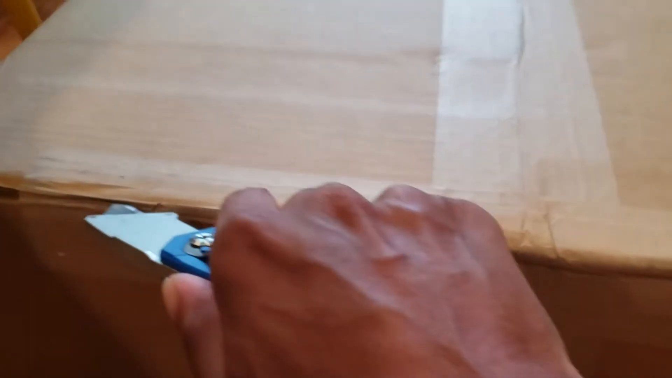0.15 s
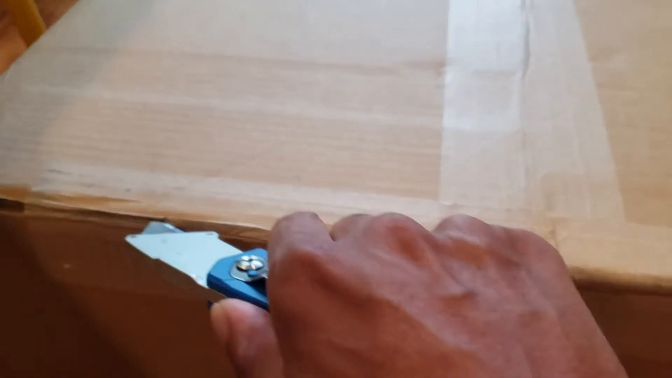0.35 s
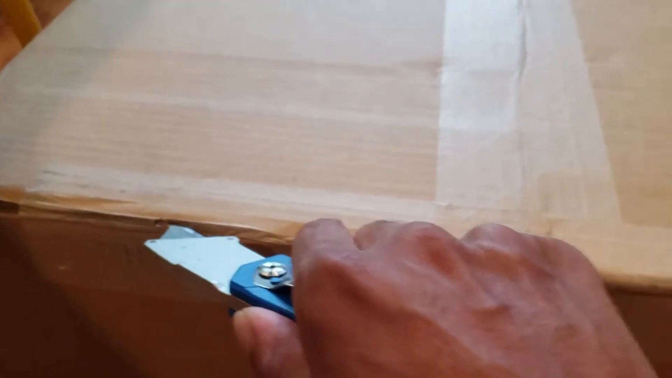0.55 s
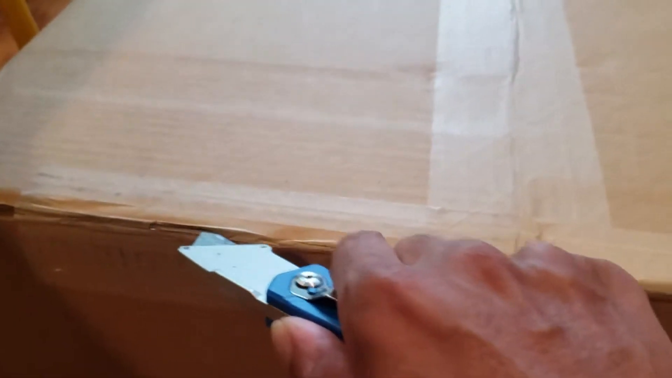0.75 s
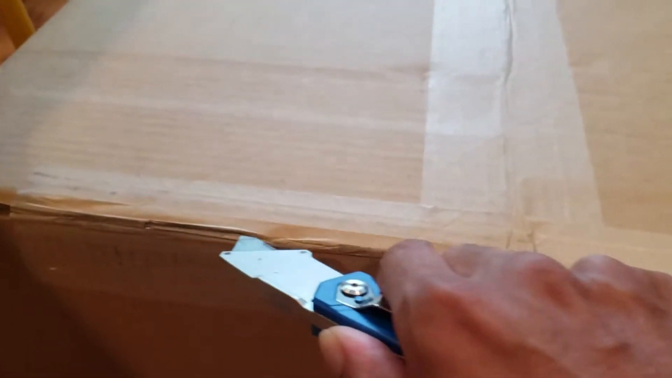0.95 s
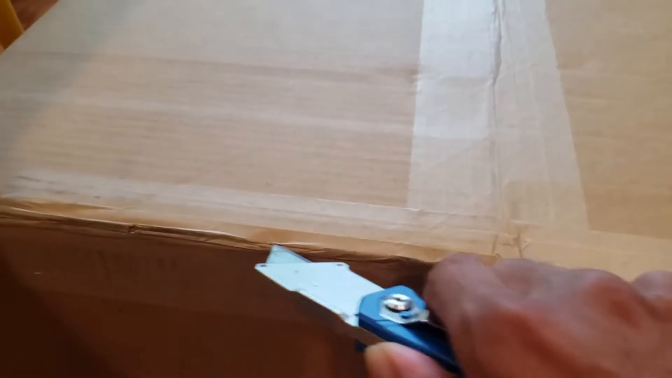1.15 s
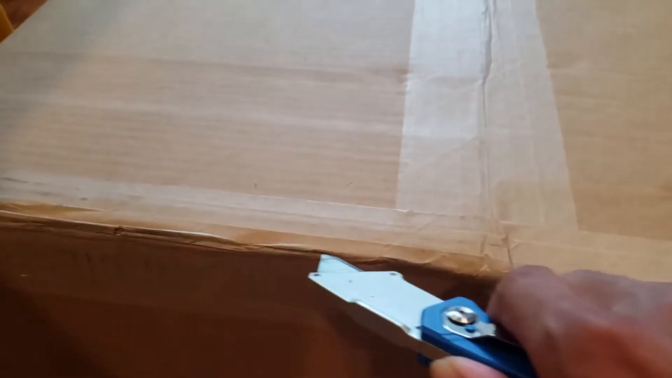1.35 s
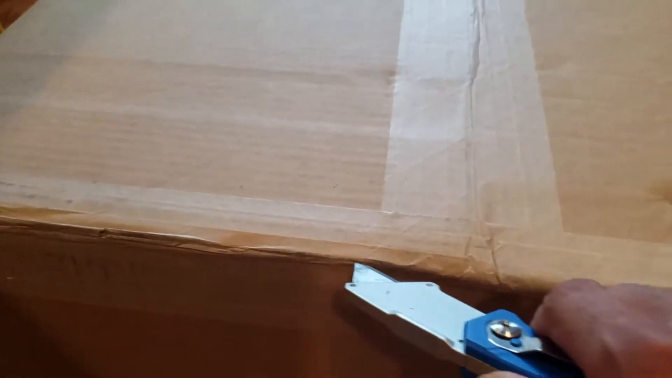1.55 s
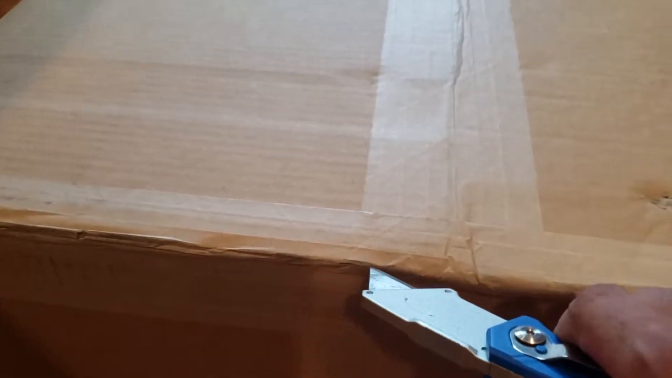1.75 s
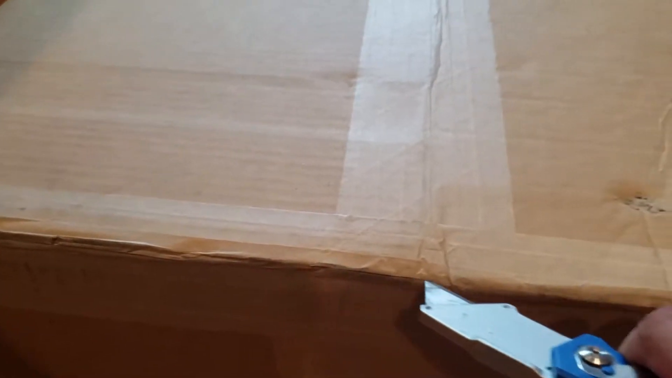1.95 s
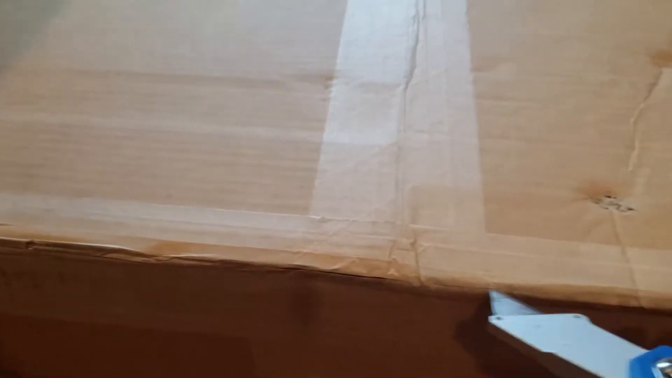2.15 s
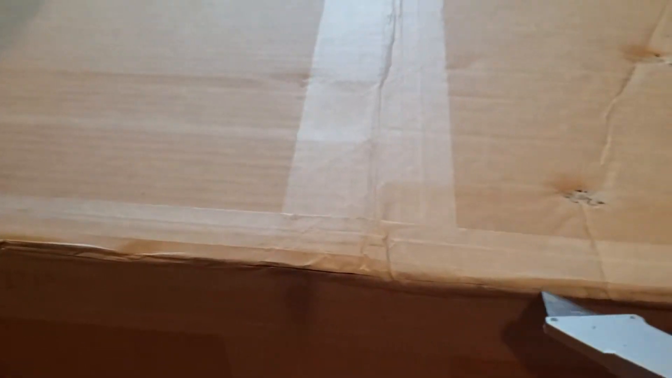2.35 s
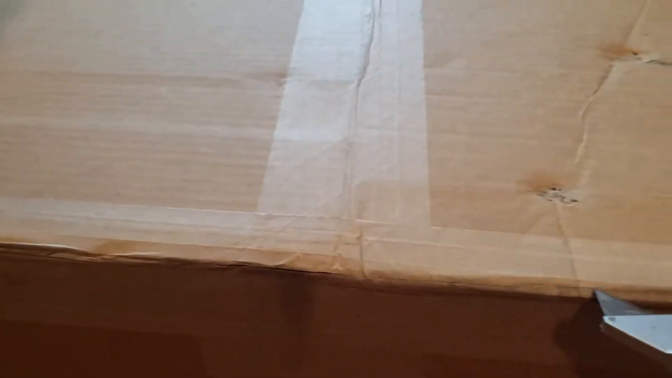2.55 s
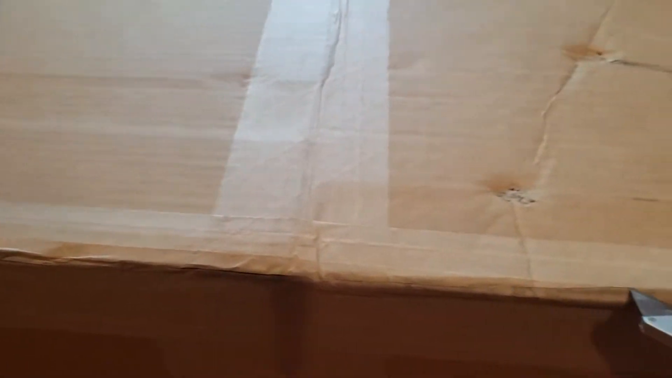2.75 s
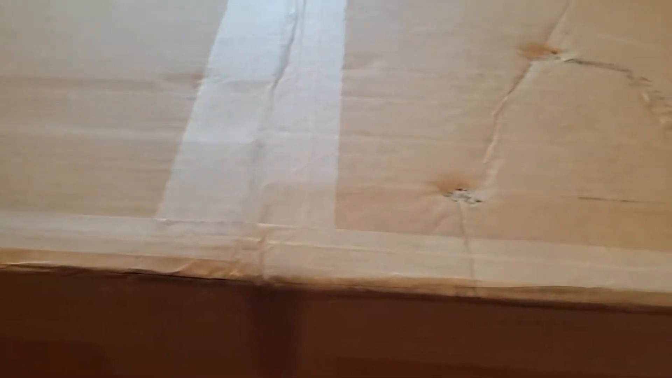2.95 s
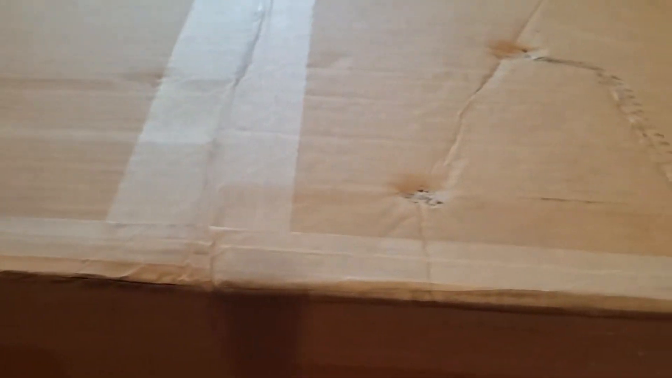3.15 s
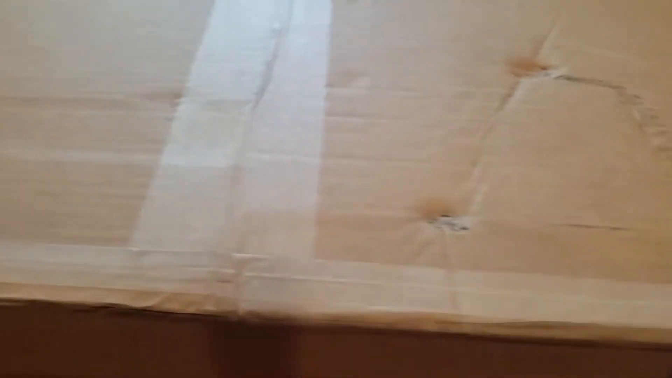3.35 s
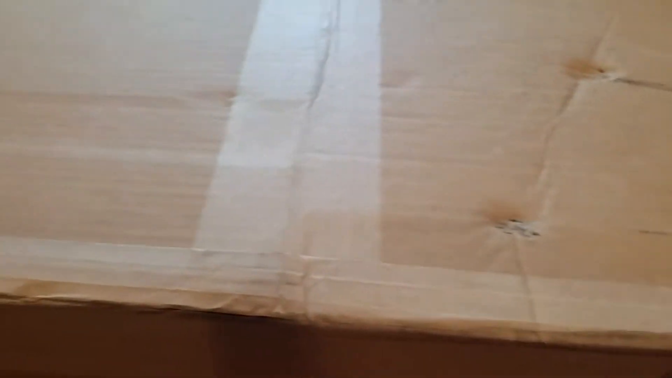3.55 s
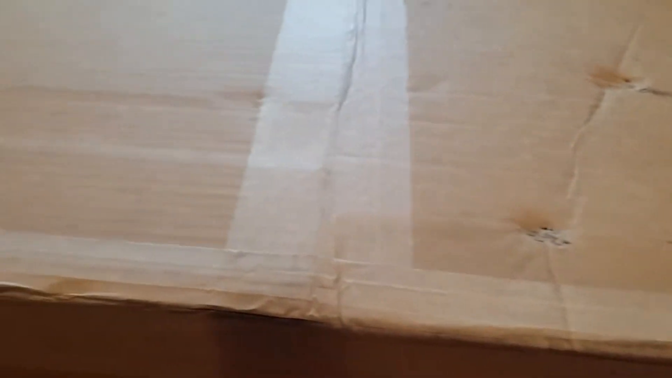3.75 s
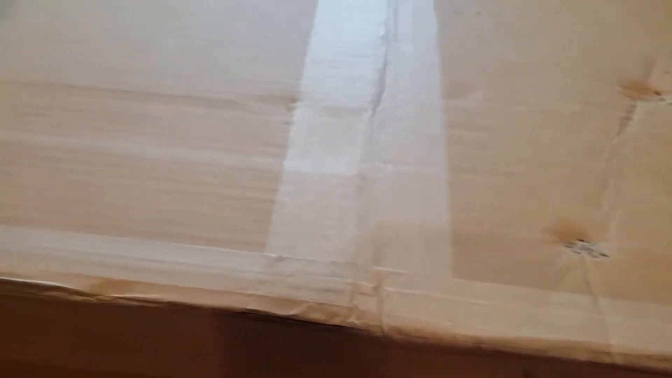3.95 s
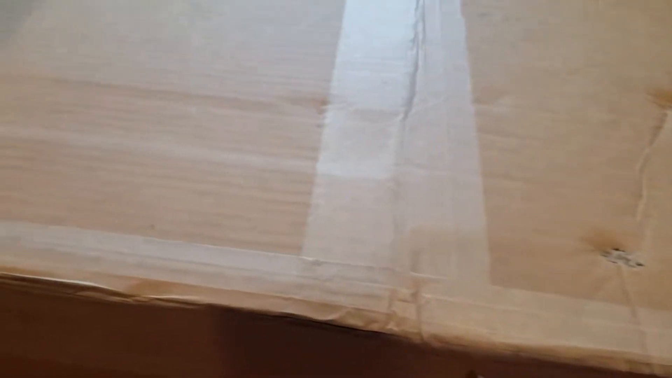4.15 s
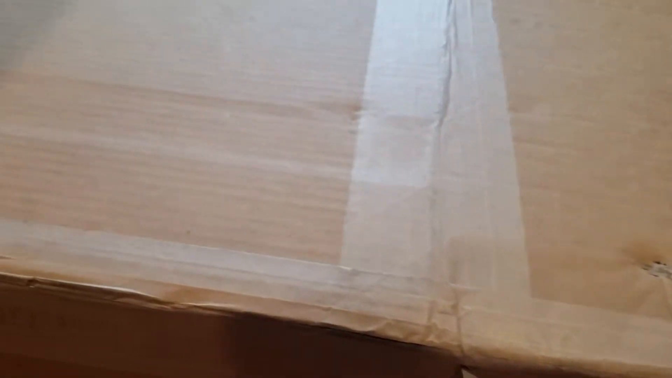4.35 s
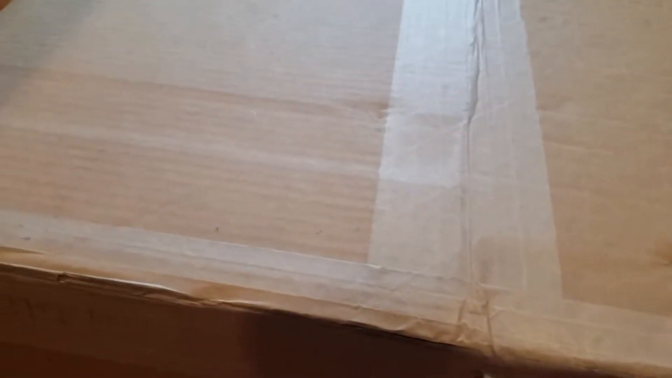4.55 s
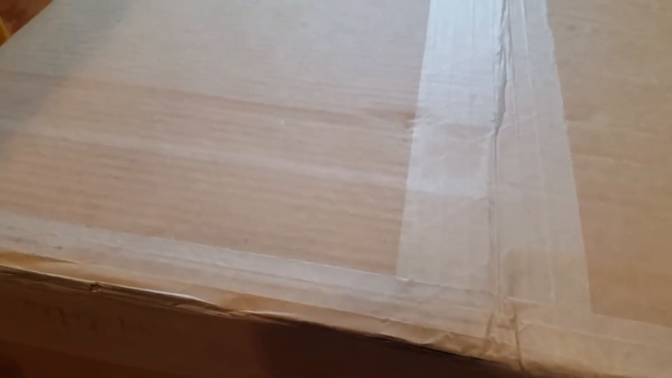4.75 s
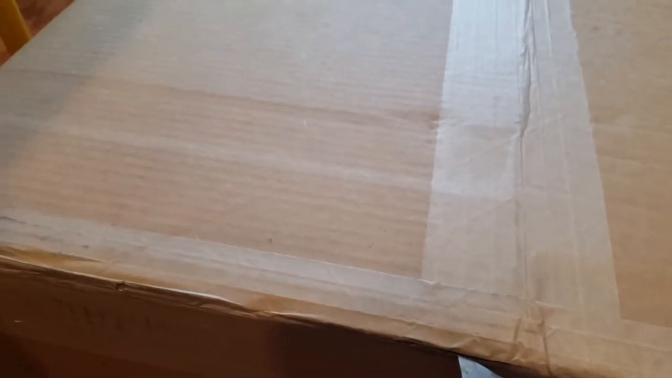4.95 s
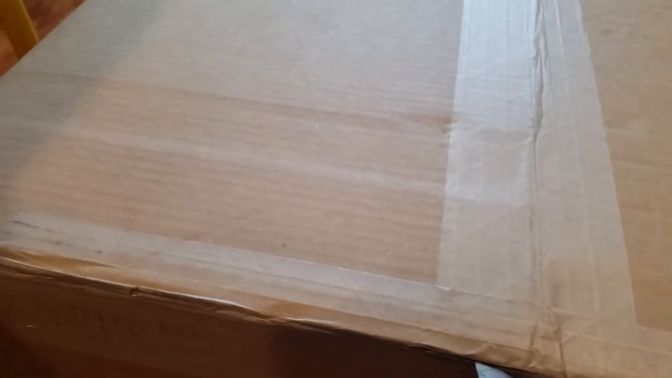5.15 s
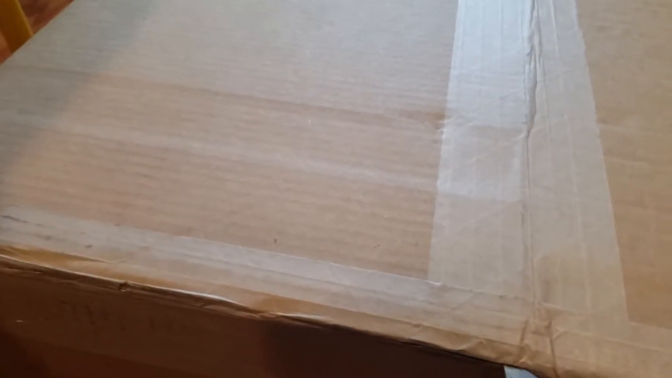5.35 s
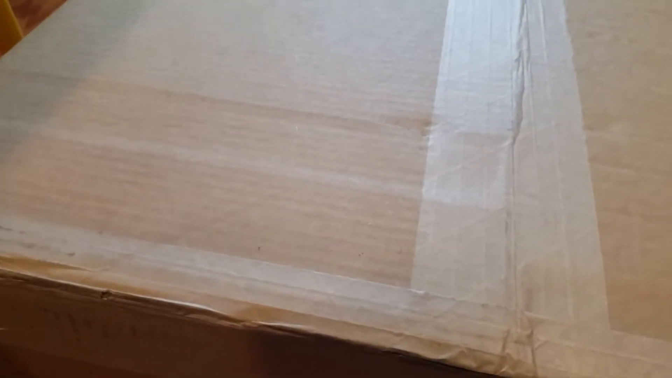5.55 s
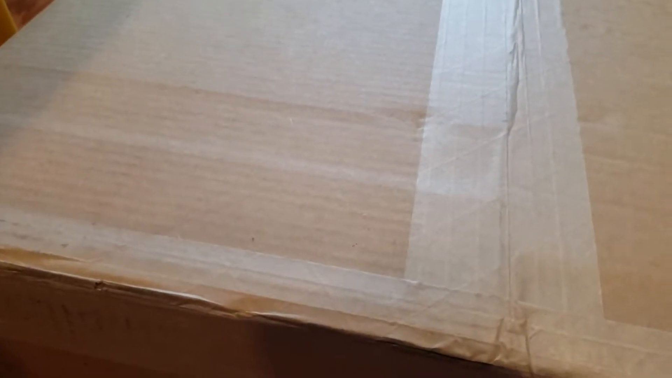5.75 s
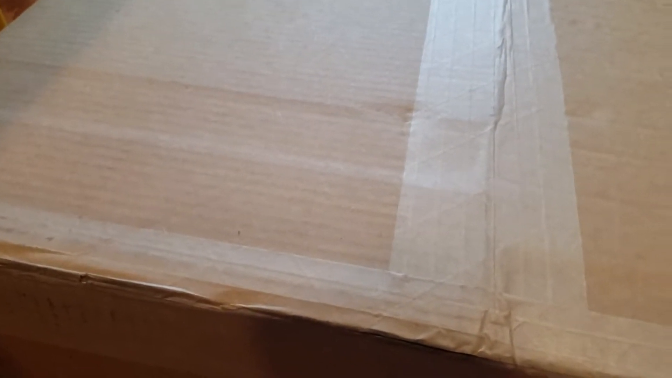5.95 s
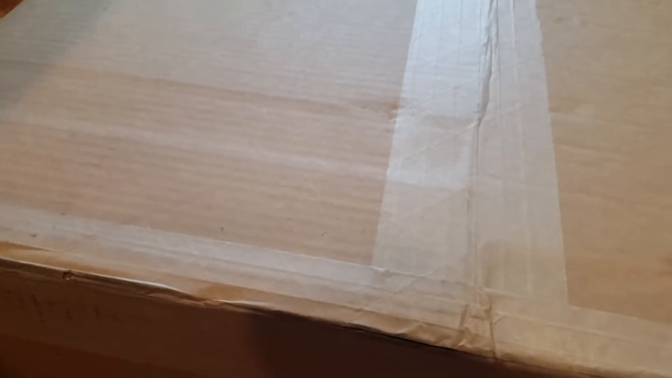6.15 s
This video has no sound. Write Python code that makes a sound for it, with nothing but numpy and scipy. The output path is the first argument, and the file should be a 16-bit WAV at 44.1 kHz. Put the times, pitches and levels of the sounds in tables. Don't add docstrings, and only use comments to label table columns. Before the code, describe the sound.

A utility knife rasps through packing tape on a cardboard box, snapping and crackling, then pauses for faint clicks before a second scratchy cut.

```python
import sys
import numpy as np
from scipy import signal
from scipy.fft import rfft, irfft, next_fast_len
from scipy.io import wavfile
from scipy.ndimage import uniform_filter1d, map_coordinates

SR = 44100
rng = np.random.default_rng(int(sys.argv[2]) if len(sys.argv) > 2 else 0)


def volts_from_decibels(level):
    exponent = np.asarray(level, float) / 20
    return 10 ** exponent


def generate_wav(sig):
    pcm = np.round(np.clip(np.atleast_2d(sig).T, -1, 1) * 32767).astype(np.int16)
    wavfile.write(sys.argv[1], SR, pcm)


N = 277429
SIZE = next_fast_len(N + SR)
HZ = np.maximum(np.arange(SIZE // 2 + 1) * SR / SIZE, 1)
CUTOFF_HZ = 15760
HUSH_DB = -78
ROOM_T60_S, ROOM_DB = 0.24, -13
MEAN_FORCE_DB = -46
SINK_S, RECOVER_S, PULL_EDGE_S = 0.022, 0.018, 0.007
SNAP_S, SNAP_FLAP_DB = 0.0017, -1.5
RIP_FLAP_DB = 1.5

# (time [s], level [dB])
HUM_LEVEL = [(0.0, -57), (0.7, -61), (0.75, -59.5), (3.06, -57.5), (4.1, -65.5), (4.4, -58), (4.62, -63),
             (6.29, -60.5)]
# (frequency [Hz], density [dB per Hz])
HUSH_SPECTRUM = [(25, -28), (47, -23), (80, -7), (133, -19), (149, -16), (217, -15), (271, -31), (323, -23),
                 (353, -32), (702, -38), (2970, -44), (8600, -54), (12000, -44), (16000, -43)]
# (frequency [Hz], likeness [0-1])
HUSH_LIKENESS = [(60, 1), (180, 0.68), (550, 1), (1650, .05), (15000, 0)]
# (delay [s], level [dB])
NEAR_ECHOES = [
    (.0006, -11),
    (.0013, -11),
    (.0024, -12),
]
# (frequency [Hz], level difference [dB])
PORT_LEAN = [(60, -4.5), (92, 2.5), (140, 0.5), (210, 2), (330, 0.5), (500, -1.5), (770, -2.5),
             (1170, -0.5), (1790, -7), (2740, -11.5), (4190, -1), (6410, 7), (9810, 0), (15000, 0)]
# (frequency [Hz], phase lead [rad])
PORT_LEAD = [(0.01, 0.), (500, .3), (1300, 1.5), (2500, 1.7), (4500, 1.46), (7000, 1.5), (10000, 1.4),
             (16000, 0)]
# (frequency [Hz], likeness [0-1])
KNIFE_LIKENESS = [(60, 0.7), (150, 1), (400, 0.7), (1200, 0.96), (3000, 0.2), (6000, 1), (13000, 1)]
PLACES_S = [.6, 1.5, 2.6, 4.7, 5.9]
# (frequency [Hz], width [Hz], lift at each of five places [dB])
MODES = [(160, 41, 6, 6, 5., 9, 9.5), (225, 14, 5, 17.5, 2, 16.5, -2), (314, 59, 5.5, 7, 11, 5, 7),
         (506, 27, 5.5, 7, 3, -11, 14.5), (654, 69, 0, 0, 6.5, 7.5, 4.5),
         (883, 48, -5.5, 2.5, -0.5, -9, 10), (1004, 220, 13, 8, 3, 4, 10),
         (1234, 45, 0, -1, 5, -4, 4.5), (1410, 60, 2.5, 4, 4.5, 3.5, 4),
         (1644, 42, -3.5, -8.5, 9, -27, -3),
         (2125, 400, 8.5, 5, 2.5, -7, 4), (2462, 170, -1.5, 6, 7, -3.5, 11),
               (2787, 200, 9, -1.5, 6, 7, 2), (3223, 220, 2, 1.5, 7.5, -10.5, 7.5),
               (3990, 200, 7.5, 1, 3.5, 5.5, -8), (4760, 290, 0, 5, -0.5, 3.5, 3),
               (5600, 620, 1, 2.5, -2, 8.5, 4), (6460, 870, 4, 5.5, 3, 1.5, 1.5),
               (7210, 1100, 8, 4, 3.5, 10, 7), (8700, 660, -1, -2.5, -5, -4, -1),
               (11960, 580, 5, -5, 0, 4, -0.5), (11400, 900, -1.5, 0.5, 1, -8, 2),
               (14070, 1400, 4.3, 3, 0, -9, 6), (15670, 750, 4.5, 5, 3, -1, 6.5)]
# (frequency [Hz], density [dB per Hz])
TEAR_COLOUR = [(35, -37), (60, -3), (149, -4), (253, -10.5), (497, -9.5), (572, -10), (657, -12),
               (1170, -19), (2470, -8), (5200, -10), (7200, -11), (8470, -14), (12600, -2), (15500, -3.5)]
# (low edge [Hz], high edge [Hz])
ZONES_HZ = [
    (1700, 4400),
    (70, 450),
    (450, 1700),
    (4400, 17000),
]
# (share of force swing followed [dB per dB], level over mean force at five places [dB])
ZONE_FOLLOWS = [
    (0.7, -4.5, -10.5, -9.5, -11, -7.5),
    (1.2, -2.5, -5, -7.5, 0.5, -10),
    (1.1, 4, 5, 4, 4.5, 3),
]
# (time [s], length [s], frequency [Hz], width [Hz], level [dB])
RUBS = [(3.008, 0.053, 1110, 250, -54), (4.318, 0.069, 2830, 370, -51), (4.915, 0.021, 3100, 140, -47),
        (5.1, 0.01, 7400, 790, -58.5), (5.34, 0.19, 1570, 360, -53), (5.334, 0.12, 1010, 63, -54),
        (5.3, .15, 2200, 190, -45.5), (2.55, 0.35, 3050, 220, -49)]
# (start [s], end [s], force at start [dB], force at end [dB], brightness [dB])
PULLS = [(0, .397, -51, -50, 1.5), (0.399, 0.473, -53.5, -66, 2), (.47, 0.577, -71.5, -66.5, 2.5),
         (0.584, 0.763, -51.5, -48.5, -1), (0.759, 1.239, -46, -48, -1), (1.235, 1.798, -45.5, -47.5, 0),
         (1.799, 1.837, -45, -41.5, 1), (1.837, 2.562, -41.5, -43, 1.5), (2.557, 2.86, -43, -38, -2.5),
         (2.855, 2.955, -40, -39, -0.5), (2.952, 3.049, -44.5, -58.5, 0), (4.324, 4.367, -63.5, -49.5, 1),
         (4.368, 4.416, -49.5, -58, 5), (4.541, 4.64, -67, -88, 2), (4.904, 5.032, -66, -71, -1.5),
         (5.194, 5.322, -57.5, -49.5, 1.5), (5.321, 5.446, -46.5, -51.5, 3.5),
         (5.45, 5.591, -60.5, -59.5, -0.5), (5.585, 5.636, -63.5, -43, 1), (5.637, 5.672, -48.5, -52, 0),
         (5.663, 5.804, -39.5, -45, 0), (5.803, 6.296, -43, -41.5, 0)]
# (time [s], length [s], depth [dB])
STALLS = [(0.091, 0.059, 4.5), (1.101, 0.04, 9), (1.191, 0.041, 3.5), (1.636, 0.16, 5), (1.984, 0.063, 11),
          (2.034, 0.042, 6), (2.815, 0.0508, 7), (5.286, 0.036, 5.5), (5.756, 0.056, 3.5),
          (6.128, 0.069, 2.5)]
# (time [s], length [s], boom level [dB])
THUMPS = [
    (1.092, 0.092, -54.5),
    (5.635, 0.05, -37.5),
]
# (time [s], peak [dB], weight [dB], brightness [dB], rubbing [s])
TOUCHES = [(4.5288, -46, -4, 7.5, 0.012), (4.9226, -42, -25, -15, 0.0075), (4.9861, -58, -14.5, 8, 0.017),
           (5.106, -67, -10.5, 17.5, 0.039), (5.1334, -57, -8, -7, 0.0097)]
# (time [s], peak [dB], weight [dB], brightness [dB], tearing [s])
RIPS = [(0.092, -41.5, -15, 4, 0.0064), (0.139, -33.5, -10.5, 4.5, 0.0074),
        (0.5765, -22.5, -10, -0.5, 0.016), (0.615, -37.5, -1, 9, 0.012), (1.152, -27.5, -11, 8, 0.01),
        (1.192, -35, -11, 3, 0.019), (1.2373, -22.5, -17, 0.5, 0.022), (2.023, -32.5, -13, 6, 0.0095),
        (2.036, -32, -10.5, 6.5, 0.015), (2.0725, -35, -12.5, 6, 0.0065), (2.193, -37, -22, 5, 0.047),
        (2.5436, -30, -9, 0, 0.012), (2.871, -31, -3, 3, 0.014), (2.909, -37, -13, 7, 0.016),
        (3.035, -42.5, -18, -8, 0.0087), (5.442, -32.5, -7.5, 9.5, 0.018), (5.625, -41, -11.5, 3, 0.0086),
        (5.636, -25, -12, 6, 0.007), (5.662, -39, -12, 8, 0.0058), (5.883, -40.5, 1, 14.5, 0.0083),
        (5.9235, -36.5, -8.5, 12, 0.023), (6.1037, -40, -26, -1, 0.014), (6.204, -33.5, -11.5, 4.5, 0.01),
        (6.232, -32, -17, 5, 0.013)]
# (time [s], peak [dB], weight [dB], brightness [dB])
SNAPS = [(0.033, -40, -20, 7), (0.362, -41, -19.5, 2), (0.384, -41, -23, 0), (0.389, -53, -14, 3),
         (0.4112, -20, -18, -11), (0.429, -29.5, -16, -5), (0.4945, -46, -19, -14),
         (0.5418, -38.5, -36, -8.5), (0.5485, -41, -20, -3), (0.5753, -35, -23, 2),
         (0.578, -20, -25.5, -22), (4.4003, -33.5, -6.5, -5), (4.9867, -53, -9, 9.5),
         (5.1024, -72.5, -4, 23), (5.114, -74.5, -4, 6.5), (5.185, -58, -12, 3), (5.195, -48, -15, 11),
         (5.4553, -21, -11, 4)]


def at_hz(points):
    hz, value = np.transpose(points)
    return np.interp(np.log(HZ), np.log(hz), value)


def drift(rate_hz):
    r = np.exp(-2 * np.pi * rate_hz / SR)
    slow = signal.lfilter([1], [1, -2 * r, r * r], rng.standard_normal(N + SR))[SR:]
    return slow / slow.std()


def causal(db):
    cepstrum = irfft(db * np.log(10) / 20, SIZE)
    cepstrum[1:SIZE // 2] *= 2
    cepstrum[SIZE // 2 + 1:] = 0
    return np.exp(rfft(cepstrum))


def stereo(shared, own, likeness):
    alike = np.clip(at_hz(likeness), 0, 1)
    common = np.sqrt((1 + alike) / 2) * shared
    opposed = np.sqrt((1 - alike) / 2) * own
    return common + opposed * [[1], [-1]]


def hum():
    s, db = np.transpose(HUM_LEVEL)
    phase = 2 * np.pi * np.cumsum(58.5 + 0.89 * drift(4.9)) / SR
    level_db = np.interp(np.arange(N) / SR, s, db) + 1.7 * drift(7.9)
    port_gain = volts_from_decibels(np.array([[.6], [-.6]])) * np.sqrt(2)
    return port_gain * volts_from_decibels(level_db) * np.sin(phase)


def hush():
    shared, own = rfft(rng.standard_normal((2, SIZE))) * volts_from_decibels(at_hz(HUSH_SPECTRUM))
    heard = (HZ > 200) * (HZ < CUTOFF_HZ)
    scale = np.sqrt(np.mean(volts_from_decibels(2 * at_hz(HUSH_SPECTRUM)) * heard))
    mid_share = np.sqrt((1 + np.clip(at_hz(HUSH_LIKENESS), 0, 1)) / 2)
    return volts_from_decibels(HUSH_DB) / scale / mid_share * stereo(shared, own, HUSH_LIKENESS)


def room():
    t = np.arange(SR // 2) / SR
    noise = rng.standard_normal((2, 2, len(t)))
    dull = signal.lfilter([.5], [1, -.55], noise[0]) * volts_from_decibels(-60 * t / ROOM_T60_S)
    bright = noise[1] * volts_from_decibels(-4.5 - 60 * t / (0.41 * ROOM_T60_S))
    tail = (dull + bright) * (1 - np.exp(-t / 0.0044))
    tail /= np.sqrt(np.sum(tail ** 2) / 2)
    return 1 + volts_from_decibels(ROOM_DB) * stereo(*rfft(tail, SIZE), HUSH_LIKENESS)


def nearby(ports):
    out, now = ports.copy(), np.arange(N)
    for delay, db in NEAR_ECHOES:
        common = 0.1657 * drift(1.2)
        for port, heard in zip(ports, out):
            lag = delay * SR * np.exp(common + .03 * drift(1.5))
            heard += volts_from_decibels(db) * map_coordinates(port, [now - lag], order=2)
    return out * volts_from_decibels(-2.0)


def box(x):
    hz, width, *lifts = np.transpose(MODES)
    shapes = 1 / (1 + ((HZ - hz[:, None]) / (width[:, None] / 2)) ** 2)
    out = 0
    for here, lift_db in zip(np.eye(len(PLACES_S)), lifts):
        share = np.interp(np.arange(N) / SR, PLACES_S, here)
        out = out + causal(lift_db @ shapes - 1.0) * rfft(share * x, SIZE)
    return out


def rubs():
    out = np.zeros(N)
    for s, length, hz, width, db in RUBS:
        at, size = round(s * SR), round(length * SR)
        r = np.exp(-np.pi * width / SR)
        poles = [1, -2 * r * np.cos(2 * np.pi * hz / SR), r * r]
        ring = signal.lfilter([1, 0, -1], poles, rng.standard_normal(SR // 2))[:size]
        out[at:at + len(ring)] += volts_from_decibels(db) * ring / ring.std() * np.sqrt(np.hanning(len(ring)))
    return out


def zones():
    parts = []
    for low, high in ZONES_HZ:
        edges_db = 10 * np.log10((1 + (low / HZ) ** 8) * (1 + (HZ / high) ** 8))
        part = causal(at_hz(TEAR_COLOUR) - edges_db)
        parts.append(part / np.sqrt(np.mean(abs(part) ** 2)))
    return parts


def slips(per_s, spread_db):
    size = volts_from_decibels(spread_db * np.minimum(rng.exponential(1, N), 5)) * rng.choice([-1, 1], N)
    grains = size * (rng.random(N) < per_s / SR)
    return grains / grains.std()


def force():
    t = np.arange(N) / SR
    force_db, bright_db = np.full(N, -95.), np.zeros(N)
    for start, end, first_db, last_db, tone_db in PULLS:
        on = (t >= start) & (t < end)
        force_db[on] = np.interp(t[on], [start, end], [first_db, last_db])
        bright_db[on] = tone_db
    for s, length, depth_db in STALLS:
        sunk = np.minimum((t - s) / SINK_S, (s + length - t) / RECOVER_S)
        force_db -= depth_db * np.clip(sunk, 0, 1)
    return uniform_filter1d([force_db, bright_db], int(PULL_EDGE_S * SR) + 1)


def pressure():
    t, (force_db, bright_db) = np.arange(N) / SR, force()
    levels = [force_db]
    for share, *place_db in ZONE_FOLLOWS:
        swing_db = share * (force_db - MEAN_FORCE_DB)
        levels.append(MEAN_FORCE_DB + swing_db + np.interp(t, PLACES_S, place_db))
    levels[3] = levels[3] + bright_db
    tear = volts_from_decibels(np.array(levels)) * (force_db > -90)
    for s, length, db in THUMPS:
        tear[1] += volts_from_decibels(db) * np.clip(1 - abs(2 * (t - s) / length - 1), 0, 1)
    tear *= volts_from_decibels(1.42 * drift(39.77) + 1.0 * drift(150))

    snap, after = np.zeros((4, N)), np.arange(SR // 25) / SR
    events = [row + (RIP_FLAP_DB,) for row in RIPS + TOUCHES]
    events += [row + (SNAP_S, SNAP_FLAP_DB) for row in SNAPS]
    for s, db, weight_db, tone_db, tearing, flap_db in events:
        at = round(s * SR)
        zone_db = np.array([0, weight_db, weight_db + flap_db, tone_db])
        gain = volts_from_decibels(db + zone_db)[:, None]
        part = after / max(tearing, .001)
        swell = (1 - np.exp(-5. * part)) * np.exp(-part ** 3)
        tear[:, at:at + len(after)] += gain * volts_from_decibels(-9) * swell
        snap[:, at] += gain[:, 0] * volts_from_decibels(12) * (tearing < .006)
    return tear, snap


def knife():
    tear, snap = pressure()
    near, far = slips(per_s=9000, spread_db=2.5), slips(per_s=12000, spread_db=1.0)
    both = 0
    for k, zone in enumerate(zones()):
        both = both + zone * rfft([tear[k] * near + snap[k], tear[k] * far], SIZE)
    shared, own = box(irfft(both, SIZE)[:, :N] + rubs() * [[1], [0]])
    left = volts_from_decibels(at_hz(PORT_LEAN) / 2) * np.exp(.5j * at_hz(PORT_LEAD))
    ports = np.array([left, 1 / left])
    balance = abs(ports.mean(axis=0)).clip(.6, 3)
    return stereo(shared, own, KNIFE_LIKENESS) * ports / balance


def scene():
    close = nearby(irfft(knife(), SIZE)[:, :N])
    return irfft(rfft(close, SIZE) * room() + hush(), SIZE)[:, :N] + hum()


def band_limit(x):
    return signal.sosfilt(signal.butter(12, 16850, fs=SR, output="sos"), x)


def record(dry):
    low_pass = signal.ellip(12, .3, 60, CUTOFF_HZ, fs=SR, output="sos")
    return band_limit(signal.sosfilt(low_pass, dry))


dry = scene()
out = record(dry)
generate_wav(out)
```